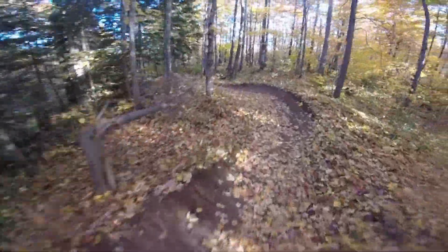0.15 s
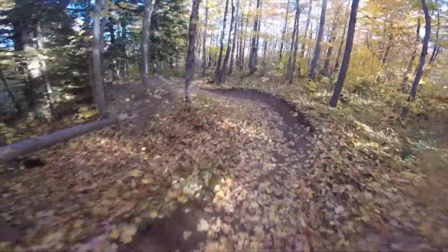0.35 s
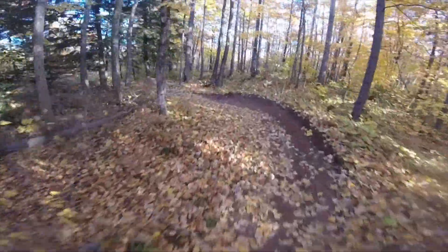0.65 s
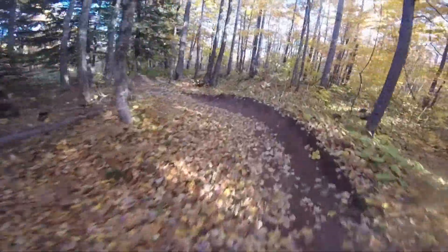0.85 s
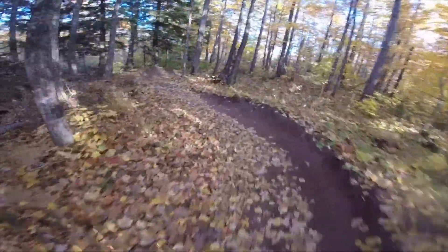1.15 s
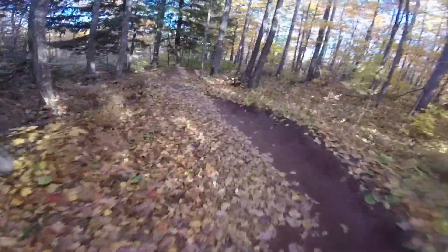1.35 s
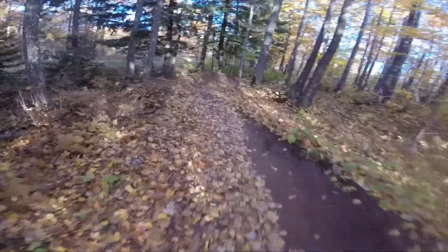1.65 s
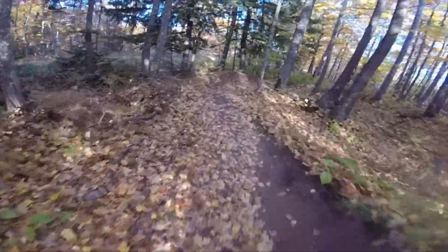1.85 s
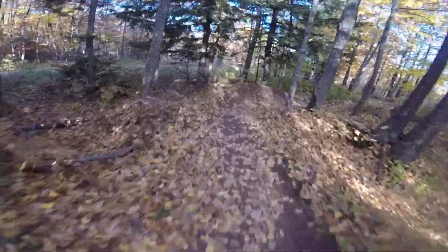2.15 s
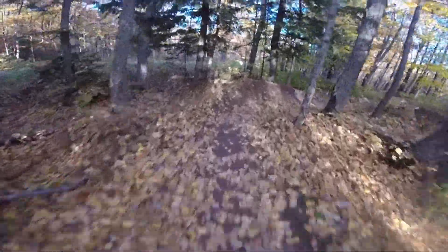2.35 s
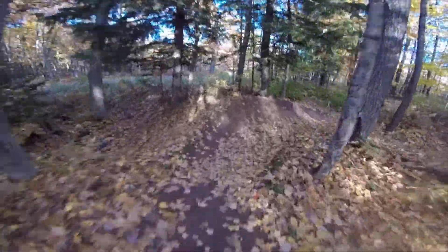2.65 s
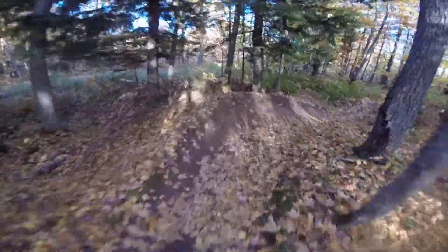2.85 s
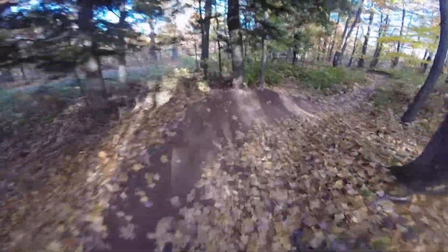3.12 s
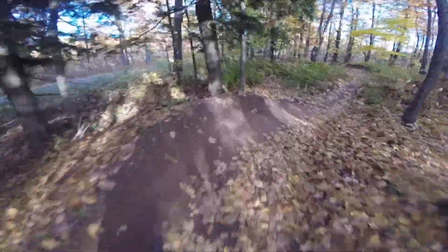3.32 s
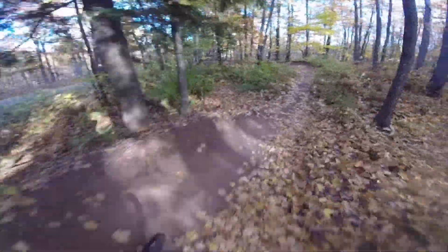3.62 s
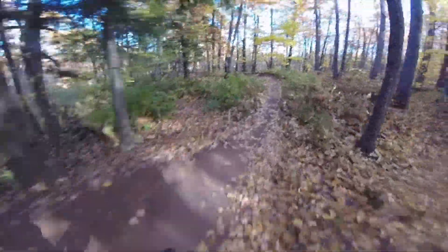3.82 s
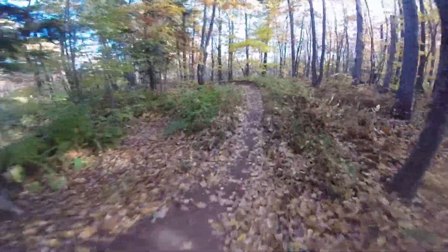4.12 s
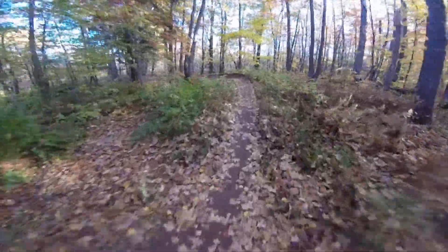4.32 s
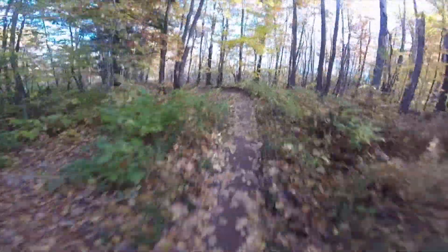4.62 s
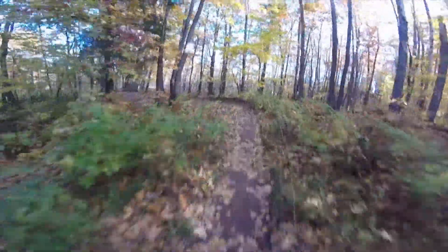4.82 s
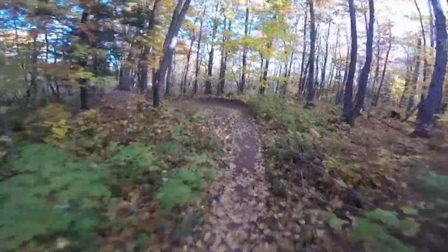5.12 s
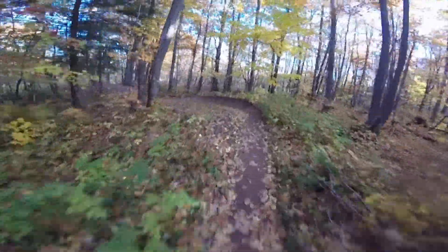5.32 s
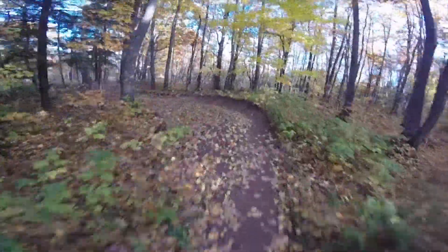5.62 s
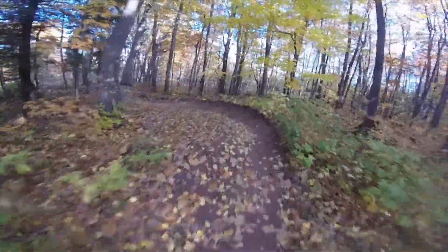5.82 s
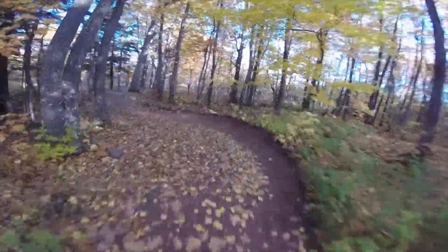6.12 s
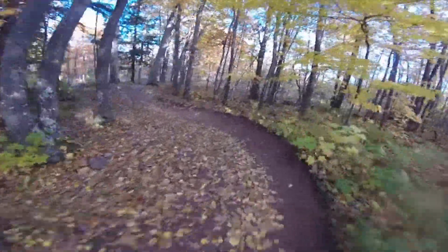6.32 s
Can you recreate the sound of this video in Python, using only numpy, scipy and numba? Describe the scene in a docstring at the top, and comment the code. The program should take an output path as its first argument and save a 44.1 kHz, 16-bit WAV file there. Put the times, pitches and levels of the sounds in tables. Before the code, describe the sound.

Heard from the rider's position in a sealed plastic casing: uneven, very low wind buffeting, a quiet rush of air and a dull rolling tyre drone. On top, brittle leaves crunch in quick, short bursts, thinning slightly midway and then growing dense again, with scattered small hard clicks from the bike. Outdoors, dry, with hardly any echo, continuous from beginning to end.

```python
"""A forest trail: a mountain bike rolls over dry leaves, heard by a camera shut in a plastic housing.
Wind buffets the housing as deep filtered noise, tyres drone as noise rung through casing resonances,
and a shaped hiss makes the rush of air. Leaves crush in bursts of tiny cracks, loose parts tick, and both
ring the housing; now and then three short tones sound together, their levels wavering quickly."""
import sys
import numpy as np
from scipy import signal
from scipy.fft import rfft, irfft
from scipy.io import wavfile
from scipy.ndimage import uniform_filter1d
from numba import njit

SR = 44100
rng = np.random.default_rng(int(sys.argv[2]) if len(sys.argv) > 2 else 0)


def wav_record(signal):
    """Record a signal, one row per channel, as 16-bit PCM in the file named by sys.argv[1]."""
    frames = np.transpose(np.atleast_2d(signal))
    bounded = np.clip(frames, -1, 1)
    # unit amplitude maps onto the largest positive 16-bit level
    quanta = np.round(bounded * 32767).astype(np.int16)
    wavfile.write(sys.argv[1], SR, quanta)


N = 285238  # length in samples

# Wind pressing on the housing: start_s, deep_buffet_db, upper_buffet_db
WIND_LEVELS = [(0.0, -38, -71), (0.03, -41.5, -58), (0.11, -47, -65), (0.27, -35.5, -45), (0.38, -46, -42),
               (0.41, -40, -49), (0.66, -42.5, -56), (0.77, -42.5, -47.5), (0.92, -45, -52),
               (0.99, -39, -44.5), (1.26, -42.5, -46), (1.51, -39.5, -52), (1.58, -43, -54),
               (1.75, -45, -44), (1.8, -51.5, -53), (2.0, -39, -46), (2.05, -49, -59), (2.21, -44.5, -56),
               (2.49, -47.5, -59), (2.66, -44, -60), (2.7, -35, -51), (2.77, -56, -64), (2.81, -47, -69),
               (2.86, -37, -48), (2.95, -36.5, -56), (3.01, -39, -47), (3.04, -31.5, -53),
               (3.08, -48, -45.5), (3.13, -38.5, -74), (3.22, -36, -64), (3.3, -46, -51),
               (3.39, -40.5, -42.5), (3.44, -41, -57), (3.53, -33.5, -44.5), (3.6, -51, -47),
               (3.69, -37, -44.5), (3.73, -43.5, -55), (3.89, -45.5, -56), (3.93, -31.5, -63),
               (3.98, -36.5, -48), (4.11, -53, -61), (4.2, -45.5, -52), (4.36, -42.5, -52),
               (4.5, -43.5, -42.5), (4.57, -44.5, -57.5), (4.72, -42.5, -38), (4.77, -45, -49),
               (4.95, -36, -44), (5.04, -39, -57), (5.4, -36.5, -47.5), (5.44, -42, -52),
               (5.62, -45.5, -55), (5.66, -40.5, -40), (5.76, -47, -64), (5.89, -41.5, -38.5),
               (6.12, -55, -64), (6.2, -41, -46), (6.29, -43.5, -54), (6.36, -40, -36.5), (6.47, -53, -75)]
# Tyres on dirt: start_s, drone_db, hum_db, upper_ring_db
TYRE_LEVELS = [(0, -53.5, -68, -79), (.43, -62, -60, -80), (.55, -62, -66, -72), (.88, -54.5, -62, -77),
               (1.1, -62.5, -70, -82), (1.21, -51.5, -57.5, -63), (1.35, -60, -63.5, -83),
               (2.0, -58.5, -66.5, -71), (2.28, -50, -66, -72), (2.34, -52, -70, -59), (2.4, -63, -50, -80),
               (2.46, -53, -59, -65), (2.55, -55, -58, -66), (2.64, -55, -55, -73), (2.72, -52.5, -70, -65),
               (2.97, -56, -68, -74.5), (4.74, -56.5, -64, -73.5), (4.83, -49.5, -58.5, -67),
               (4.94, -69, -72, -87), (5.1, -56.5, -65.5, -69), (5.91, -62, -69, -75),
               (6.05, -53, -60, -74), (6.17, -57, -70, -76), (6.47, -67, -71, -84)]
# Carpet of leaves under the wheels: start_s, rustle_db, low_ring_db, bright_rustle_db
CARPET_LEVELS = [(0.0, -63, -64.5, -67), (0.23, -65, -63, -78), (0.52, -62, -61, -68),
                 (0.86, -68, -65.5, -70), (1.21, -64, -65.5, -70), (1.62, -75, -68, -72.5),
                 (2.18, -67, -66.5, -70.5), (2.41, -64, -67, -69), (2.72, -64, -72, -68),
                 (2.9, -77, -63, -83), (3.1, -63, -62, -68), (3.48, -65, -62, -71), (3.73, -68, -62.5, -74),
                 (4.12, -69.5, -65, -76.5), (4.43, -61, -62.5, -65), (4.92, -65, -62.5, -76.5),
                 (5.39, -61.5, -62.5, -67), (5.76, -76, -77, -74), (6.02, -78, -70, -74.5),
                 (6.47, -73, -64, -72.5)]
# Louder leaves, crushed one by one:
# start_s, level_db, low_ring_relative_db, brightness_relative_db, length_s, leaf_tone_hz
CRUNCHED_LEAVES = [(0.128, -38.5, -5, -8.5, 0.014, 3300), (0.18, -53, 10, -9, 0.016, 3200),
                   (0.235, -42.5, -7, -6, 0.012, 3220), (0.264, -43.5, -13, -4, 0.015, 2830),
                   (0.283, -42, -13, -1.5, 0.011, 3240), (0.3144, -46.5, 1, -9, 0.022, 2860),
                   (0.399, -40.5, -3, -8.5, 0.022, 3330), (0.4444, -46, -12, -9, 0.015, 3600),
                   (0.519, -42.5, 2, -6, 0.017, 3240), (0.5691, -48, -7, -9, 0.015, 2880),
                   (0.59, -45, -5, -14, 0.015, 3120), (0.6414, -41.5, 2, -6, 0.015, 2920),
                   (0.6483, -43.5, 4.5, -4, 0.02, 2770), (0.6874, -40.5, -1, -4.5, 0.027, 2780),
                   (0.854, -44, 1.5, -9, 0.013, 2580), (0.8724, -44, -7, -5.5, 0.015, 3630),
                   (0.9474, -41.5, -18, -3.5, 0.014, 2880), (1.047, -43.5, 2, -1.5, 0.011, 2830),
                   (1.1574, -44.5, -8, -3, 0.013, 2820), (1.3545, -48, 7, 3.5, 0.022, 2870),
                   (1.436, -40, -6, -5, 0.022, 2220), (1.645, -48.5, 1, -6, 0.015, 3270),
                   (1.693, -45, -13, -7, 0.018, 2950), (1.74, -44, -7, -7, 0.019, 2980),
                   (1.7536, -40.5, -3, -1, 0.016, 2980), (1.8056, -40, -12, -1.5, 0.011, 3840),
                   (1.844, -46.5, -10, -5.5, 0.024, 3130), (1.891, -40, -8, -6.5, 0.017, 2300),
                   (2.0867, -48.5, -11, -8, 0.02, 2760), (2.134, -45, -16, -22, 0.0093, 2940),
                   (2.17, -47, -13, -11, 0.015, 2870), (2.193, -44.5, -0.5, -14, 0.017, 3130),
                   (2.2464, -48.5, 4, -7.5, 0.029, 3150), (2.295, -46.5, 0, -14, 0.035, 3100),
                   (2.434, -40.5, -8, -14, 0.013, 3880), (2.483, -40.5, -1, -3, 0.015, 2740),
                   (2.5254, -41, -1.5, -7.5, 0.015, 2350), (2.563, -42.5, -3, -14, 0.023, 3200),
                   (2.6823, -34.5, -7.5, -14, 0.014, 2480), (2.705, -39.5, -2, -6, 0.013, 2870),
                   (2.829, -46, -7, -6, 0.015, 3100), (2.8515, -46, 3, -9, 0.02, 2220),
                   (2.888, -50, 6, -24, 0.025, 2200), (2.9174, -46.5, -4, -6, 0.025, 2800),
                   (2.961, -50, -9, -1.5, 0.017, 2800), (3.1694, -50, 0, -1, 0.018, 2810),
                   (3.212, -46, -15, -1.5, 0.021, 3100), (3.298, -42.5, -20, -5, 0.013, 3850),
                   (3.3784, -43, -7, -7, 0.017, 2500), (3.4384, -51, 14, -12, 0.015, 3400),
                   (3.453, -44, -6, -19, 0.019, 2870), (3.528, -48, -9, -9, 0.015, 3030),
                   (3.5934, -49, -2, -11, 0.026, 3100), (3.6424, -48, 2, -8, 0.034, 3180),
                   (3.826, -49, -4, -15, 0.017, 3320), (3.9324, -41.5, -2, -8.5, 0.029, 2770),
                   (3.9864, -41, -5.5, -6, 0.018, 2750), (4.126, -46, -12, -4, 0.027, 2940),
                   (4.203, -41, -3, -9, 0.011, 2330), (4.32, -43.5, -3, -7, 0.022, 2860),
                   (4.347, -40.5, -21, -14, 0.023, 3240), (4.366, -39.5, -18, -4, 0.015, 3220),
                   (4.395, -47.5, -11, 5, 0.015, 2770), (4.459, -39.5, -8, -4.5, 0.02, 2380),
                   (4.4794, -50, -5, 0, 0.015, 2160), (4.514, -43, 2, -12, 0.017, 3290),
                   (4.5304, -39, -3.5, -6, 0.019, 3410), (4.546, -44, -1, 1, 0.033, 2820),
                   (4.593, -42.5, -2, -18, 0.016, 2820), (4.7227, -44.5, -14, -3.5, 0.017, 3100),
                   (4.78, -47, 1, -9, 0.015, 2800), (4.809, -40, 4, -2.5, 0.021, 3400),
                   (4.823, -40, -7, -4, 0.039, 2600), (4.856, -43.5, -9, 1, 0.022, 2900),
                   (4.8744, -40, 5.5, -14, 0.018, 2260), (4.8994, -42, -6, 2, 0.01, 3930),
                   (4.918, -45.5, 8, -27, 0.016, 3180), (4.994, -43.5, -20, 1, 0.0096, 3130),
                   (5.085, -49, 7, 0, 0.015, 3040), (5.111, -47, -2, -4, 0.015, 2920),
                   (5.182, -37.5, -9, -4, 0.019, 2770), (5.213, -42.5, -13, -13, 0.023, 2410),
                   (5.2574, -49, -9, 5, 0.015, 2880), (5.344, -38, -4, -3, 0.021, 2800),
                   (5.461, -39.5, -4, -11, 0.012, 2980), (5.501, -48, -1, 0.5, 0.04, 2780),
                   (5.5424, -41, -3, -2, 0.028, 3230), (5.592, -44.5, -2, 0, 0.013, 2380),
                   (5.6504, -42.5, -2, -2.5, 0.012, 2810), (5.685, -46.5, -3, -3, 0.015, 2810),
                   (5.763, -41.5, -2, -5, 0.022, 2930), (5.8374, -39, -1, -4.5, 0.01, 3100),
                   (5.92, -40.5, -3, -6, 0.01, 2430), (5.742, -44, -12, -14, 0.016, 3200),
                   (5.884, -50, -11, -14, 0.012, 3150), (5.904, -53, -11, -14, 0.012, 3200),
                   (5.937, -44, -8, -11, 0.015, 3420), (6.01, -51, -9, -2, 0.015, 2900),
                   (6.0554, -50, -7, -7, 0.015, 3010), (6.113, -52, 3, -14, 0.02, 2420),
                   (6.183, -47, -5, -18, 0.015, 3170), (6.215, -56, 7, -12, 0.02, 2800),
                   (6.256, -51, 1, -6, 0.018, 3160), (6.3573, -40, -4, -2.5, 0.018, 2870),
                   (6.396, -46.5, 2, -8, 0.018, 3030), (6.45, -41, -8, -8.5, 0.023, 2900)]
# Loose parts ticking against the frame: start_s, level_db, ring_hz, ring_time_s, housing_share_db
LOOSE_PARTS = [(0.1306, -34, 3230, 0.0015, 1), (0.289, -42, 3340, .0022, 15), (0.38, -47, 1690, 0.0071, -1),
               (0.856, -53, 2900, .0025, 14), (1.381, -46, 1410, 0.0082, -1), (1.438, -50, 2400, .003, 8),
               (1.755, -49, 2900, .0025, 15), (1.893, -40, 2340, 0.0021, 12), (2.141, -50, 3600, .002, 14),
               (2.196, -43, 3000, 0.0028, 6), (2.466, -47, 4230, 0.0018, 10),
               (2.691, -36.5, 2470, 0.0033, 6), (3.073, -43.5, 1503, 0.0081, 3),
               (3.316, -52, 2780, .003, 11), (3.361, -47, 2060, 0.0039, 16),
               (3.854, -48.5, 3100, 0.0027, 19), (4.011, -39, 3180, 0.0042, 16),
               (4.262, -43, 1510, 0.0037, 15), (4.355, -50, 2780, 0.0017, 17),
               (4.459, -49, 2340, 0.0027, 17), (4.516, -45, 3220, .0025, 13),
               (4.945, -42.5, 3050, .003, 12), (5.136, -39.5, 1510, 0.0034, 12),
               (5.556, -41.5, 1746, 0.01, 6), (5.842, -49, 2970, 0.0017, 19), (6.359, -49, 2880, .002, 12)]
# Short fluttering tones: start_s, length_s, then pitch_hz and level_db for each of three rings
FLUTTERING_TONES = [(1.359, .015, 5800, -60, 8350, -59, 11500, -72),
                    (2.862, .018, 7400, -64, 8400, -70, 6400, -72),
                    (3.362, .017, 840, -54, 2120, -49.5, 1700, -55)]
# Housing resonances in three bands: pitch_hz, width_hz, relative_db
HOUSING_LOW_MODES = [(1438.5, 45, -2), (1595, 133, -11), (1710, 67, -5.5)]
HOUSING_MID_MODES = [(1996, 280, -6), (2418, 123, 0.5), (2828, 107, 3), (3316, 180, 3.5), (3450, 234, -1),
                     (4096, 506, -3)]
HOUSING_HIGH_MODES = [(5770, 520, -5.5), (6510, 410, 0), (8050, 320, -2), (8480, 194, -1.5),
                      (9740, 2300, -13.5), (12000, 1300, -21.5)]
# Tyre casing resonances for the drone, the hum and the upper ring: pitch_hz, width_hz, relative_db
CASING_DRONE_MODES = [(145, 65, -3.5), (229.6, 158, -6.5), (278.5, 113, -7), (374, 177, -14)]
CASING_HUM_MODES = [(180, 11, 0)]
CASING_UPPER_MODES = [(608, 22, 0)]
# Tone colour of the steady rush of air: pitch_hz, relative_db (per Hz)
AIR_COLOUR = [(41, -61), (70, -8.5), (107, -3), (168, -8.5), (1040, -21), (1270, -22), (1430, -18),
              (1870, -24.5), (2930, -21.5), (5260, -33.5), (8240, -41.5), (10500, -44.5), (12100, -42),
              (13200, -45.5), (15100, -50)]

GUST_DB, GUSTS_PER_S = -0.38, 11  # quick unsteadiness on top; the dB figure scales walk()
EDDY_S = 0.08  # averaging span when evening out a noise
AIR_DB = -56.5
AIR_BASS_HZ, AIR_BASS_FOLLOWS = 121, 0.55  # bass below this follows the upper buffet, in dB per dB
CREST_DB = 11.5  # peaks of a burst stand well over its mean level
RISE_S, FALL_SHAPE = 0.003, 2.1  # leaf burst: straight rise, exponent of the fall
UPPER_TONES_HZ, UPPER_SPREAD_HZ = (6680, 7730), 510  # duller leaves centre on the first, bright on the second
BRIGHT_LEAF_DB = -6.5  # relative brightness above which a leaf counts as bright
# Fainter leaves at random moments
FAINT_PER_S, FAINT_DB, FAINT_S = 22, -55, 0.005
FAINT_SPREAD_DB, FAINT_LOW_DB, FAINT_BRIGHT_DB, FAINT_HZ = 2.5, -6, -9, 2900
KNOCK_TOP_HZ = 4500  # softens the knocks that reach the housing
FLUTTER_RISE_S = 0.0025
TOP_HZ = 15250


def undb(db):
    """Decibels to amplitude."""
    return 10 ** (np.asarray(db) / 20)


def unit(x):
    """Scale to rms 1."""
    return x / np.sqrt(np.mean(x ** 2))


def curves(table):
    """Columns of a table after the first, as sample-by-sample curves."""
    start_s, *columns = np.transpose(table)
    return [np.interp(np.arange(N) / SR, start_s, column) for column in columns]


def walk(rate):
    """Random levels joined by straight lines, rate a second; rms near 1.5."""
    steps = int(N / SR * rate) + 2
    levels = rng.standard_normal(steps)
    return 1.88 * np.interp(np.arange(N) * rate / SR, np.arange(steps), levels)


@njit
def svf(x, hz, width):
    """State-variable band-pass, gain 1 at the centre."""
    y, band, low = np.empty(len(x)), 0., 0.
    g, damping = np.tan(np.pi * hz / SR), width / hz
    for i in range(len(x)):
        v = (band + g * (x[i] - low)) / (1 + g * (g + damping))
        band = 2 * v - band
        low = low + 2 * g * v
        y[i] = damping * v
    return y


def ring(x, modes, flicker_db=0., per_s=40):
    """A bank of resonances, near rms 1 for white noise of rms 1; the drive of each can flicker."""
    power = sum(undb(db) ** 2 * np.pi * width / SR for hz, width, db in modes)
    total = np.zeros(N)
    for k, (hz, width, db) in enumerate(modes):
        drive = x * undb(flicker_db * walk(per_s))
        # neighbouring modes swing in opposite senses
        total += (-1) ** k * undb(db) * svf(drive, 1. * hz, 1. * width)
    return total / np.sqrt(power)


def even(x):
    """Noise at rms 1 with most level swings longer than one eddy taken out."""
    slow_power = uniform_filter1d(unit(x) ** 2, size=int(EDDY_S * SR))
    return unit(x / np.sqrt(slow_power + 0.024))


def wind():
    """Slow pressure swings of eddies on the housing, in a deep and an upper band."""
    deep_db, upper_db = (db + GUST_DB * walk(GUSTS_PER_S) for db in curves(WIND_LEVELS))
    deep = svf(svf(rng.standard_normal(N), 21.3, 10.7), 9.0, 35.0)
    upper = svf(svf(svf(rng.standard_normal(N), 52.7, 32.0), 32.3, 45.), 56.0, 47.0)
    gusts = undb(deep_db) * even(deep) + undb(upper_db) * even(upper)
    # eddies this large change too slowly to reach higher notes
    return signal.sosfilt(signal.butter(4, 66., fs=SR, output="sos"), gusts)


def tyres():
    """Rough ground shakes the tyre casings; two narrow rings hum on more evenly."""
    drone_db, hum_db, upper_db = curves(TYRE_LEVELS)
    ground = rng.standard_normal(N)
    drone = ring(undb(drone_db) * ground, CASING_DRONE_MODES)
    hum = undb(hum_db) * even(ring(ground, CASING_HUM_MODES))
    upper_ring = undb(upper_db) * even(ring(ground, CASING_UPPER_MODES))
    return drone + hum + upper_ring


def air():
    """Broadband rush that wavers a little; its bass follows the wind's smoothed upper buffet."""
    hz = np.maximum(np.arange(N // 2 + 1) * SR / N, 1)
    colour_hz, colour_db = np.transpose(AIR_COLOUR)
    shape = undb(np.interp(np.log(hz), np.log(colour_hz), colour_db))
    rush = unit(irfft(rfft(rng.standard_normal(N)) * shape, N))
    bass = irfft(rfft(rush) / (1 + (hz / AIR_BASS_HZ) ** 4), N)
    buffet_db = uniform_filter1d(curves(WIND_LEVELS)[1], size=SR // 4)
    bass_gain = undb(AIR_BASS_FOLLOWS * (buffet_db - buffet_db.mean()))
    waver = undb(AIR_DB + 0.39 * walk(12))
    return waver * (rush - bass + bass * bass_gain)


def cracks(per_s, spread_db, top_db):
    """Tiny fractures at random moments and of either sign, some larger than the rest; rms 1 overall."""
    moment, size_draw, sign_draw = rng.random((N, 3)).T
    size = undb(np.minimum(-spread_db * np.log(1 - size_draw), top_db))
    return unit((moment < per_s / SR) * size * np.sign(sign_draw - .5))


def faint_crunches():
    """Faint leaves with the columns of CRUNCHED_LEAVES, scattered in time, level, colour and tone."""
    count = int(FAINT_PER_S * N / SR)
    start_s = (np.arange(count) + rng.random(count)) / FAINT_PER_S
    level, low, bright, tone = rng.standard_normal((count, 4)).T
    return np.transpose([start_s, FAINT_DB + FAINT_SPREAD_DB * level,
                         FAINT_LOW_DB + 3 * low, FAINT_BRIGHT_DB + 3 * bright,
                         np.full(count, FAINT_S), FAINT_HZ * (1 + 0.14 * tone)])


def leaves():
    """Cracks ring the housing as a steady rustle; each crushed leaf adds a burst and two tones of its own."""
    rustle_db, low_db, bright_db = curves(CARPET_LEVELS)
    # rows: low, middle and bright band, all unsteady together
    power = undb(np.array([low_db, rustle_db, bright_db]) + 1.8 * walk(140)) ** 2
    fracture = cracks(per_s=7000, spread_db=4.0, top_db=5.5)
    tones = np.zeros(N)
    rows = np.vstack([CRUNCHED_LEAVES, faint_crunches()])
    for (start_s, db, low, bright, length, hz), stiff in zip(rows, rng.standard_normal(len(rows))):
        i = int(start_s * SR)
        t = np.arange(min(int(3 * length * SR), N - i)) / SR
        span = slice(i, i + len(t))
        # rises fast, holds and dies away
        envelope = np.minimum(t / RISE_S, 1) * np.exp(-(t / length) ** FALL_SHAPE)
        burst = undb(db - CREST_DB) * envelope
        power[:, span] += (undb(np.array([[low], [0], [bright]])) * burst) ** 2
        # every leaf has its own stiffness, so its own two tones
        upper_hz = UPPER_TONES_HZ[int(bright > BRIGHT_LEAF_DB)] + UPPER_SPREAD_HZ * stiff
        push = burst * fracture[span]
        tones[span] += undb(15.0) * svf(push, 1. * hz, 80.0)
        tones[span] += undb(bright - 9.0) * svf(push, 1. * upper_hz, 210.0)
    low_push, mid_push, high_push = np.sqrt(power) * fracture
    rung = (tones + ring(low_push, HOUSING_LOW_MODES, .4) + ring(mid_push, HOUSING_MID_MODES, 1.2)
            + ring(high_push, HOUSING_HIGH_MODES, 1.1))
    # the housing wall holds back the highest treble
    return signal.sosfilt(signal.butter(3, 10800., fs=SR, output="sos"), rung)


def ticks():
    """One sharp knock each: the part's own short ring, and the housing answers."""
    parts, knocks = np.zeros(N), np.zeros(N)
    t = np.arange(int(.06 * SR)) / SR
    for start_s, db, hz, ring_s, share_db in LOOSE_PARTS:
        i = int(start_s * SR)
        envelope = np.minimum(t / 0.00058, 1) * np.exp(-t / ring_s)
        parts[i:i + len(t)] += undb(db) * envelope * np.sin(2 * np.pi * hz * t)
        knocks[i] = undb(db + share_db)
    softened = signal.sosfilt(signal.butter(4, KNOCK_TOP_HZ, fs=SR, output="sos"), knocks)
    return parts + ring(softened, HOUSING_MID_MODES)


def fluttering_tones():
    """Short fluttering tones: three rings each, their levels wavering quickly."""
    out = np.zeros(N)
    t = np.arange(int(.06 * SR)) / SR
    for start_s, length, *rings in FLUTTERING_TONES:
        i = int(start_s * SR)
        envelope = np.minimum(t / FLUTTER_RISE_S, 1) * np.exp(-(t / length) ** 2)
        for hz, db in zip(rings[::2], rings[1::2]):
            flutter = undb(2.0 * walk(300)[:len(t)])
            out[i:i + len(t)] += undb(db) * flutter * envelope * np.sin(2 * np.pi * hz * t)
    return out


def scene():
    """All the layers summed into one channel."""
    return (wind() + tyres() + air() + leaves() + ticks() + fluttering_tones())[None]


def record(dry):
    """The camera cuts the top steeply."""
    return signal.sosfilt(signal.ellip(10, .2, 60, TOP_HZ, fs=SR, output="sos"), dry)


dry = scene()
out = record(dry)
wav_record(out)
```